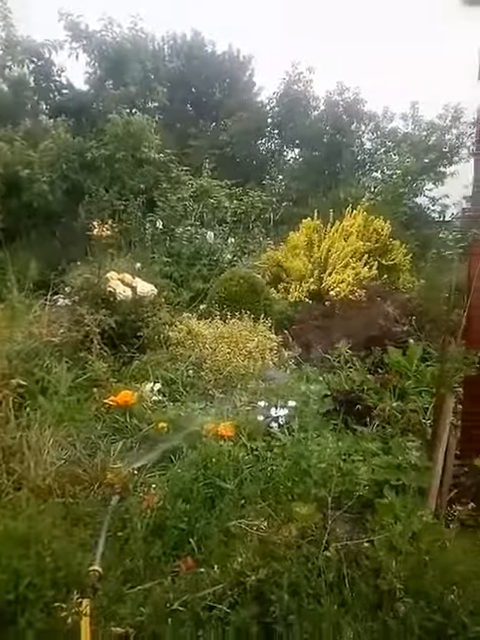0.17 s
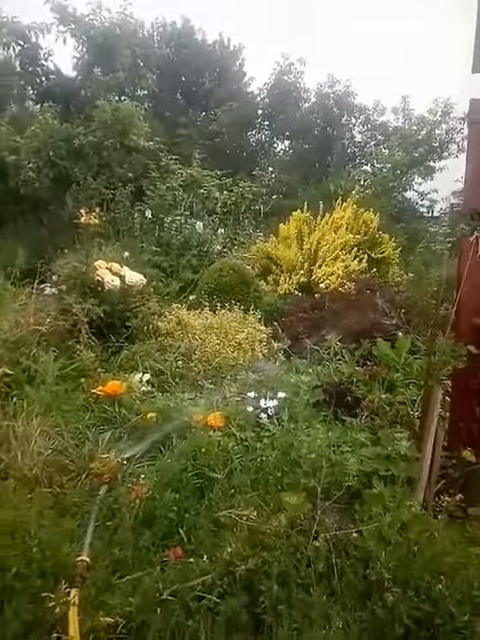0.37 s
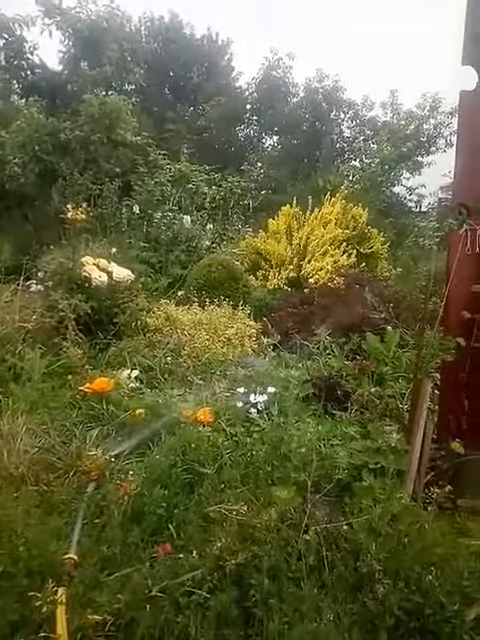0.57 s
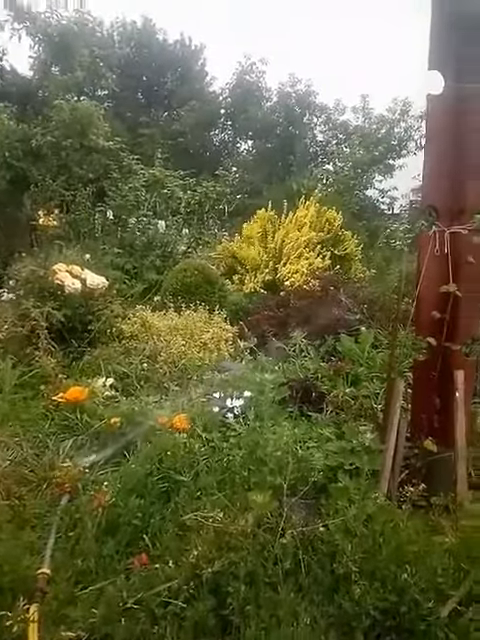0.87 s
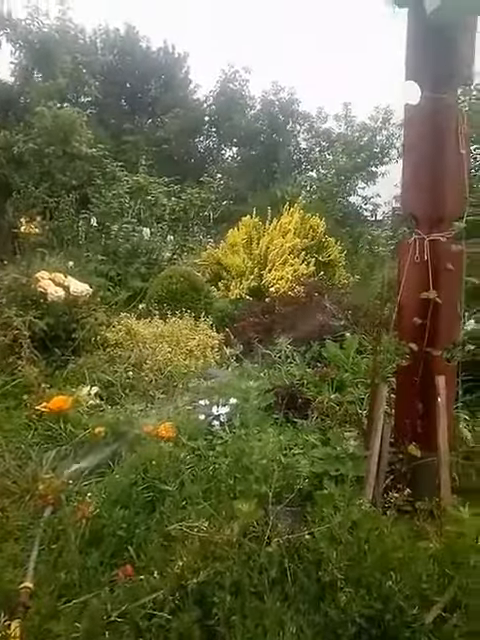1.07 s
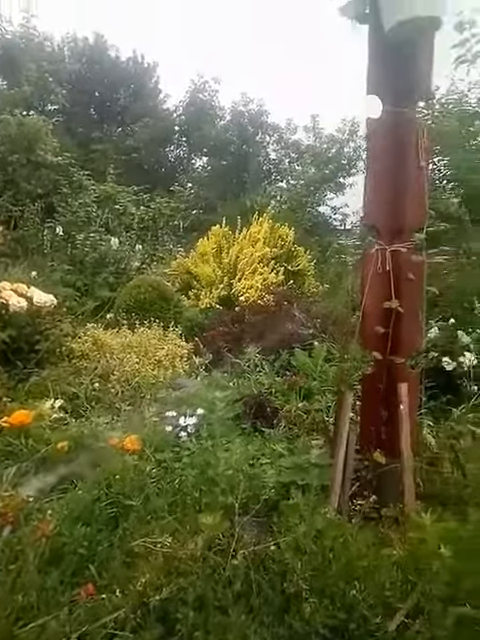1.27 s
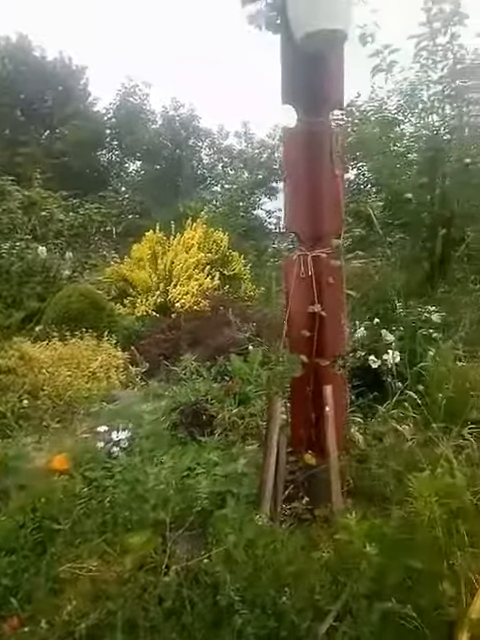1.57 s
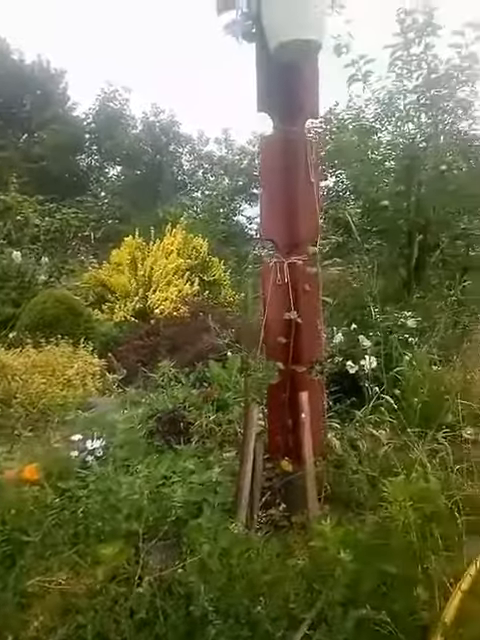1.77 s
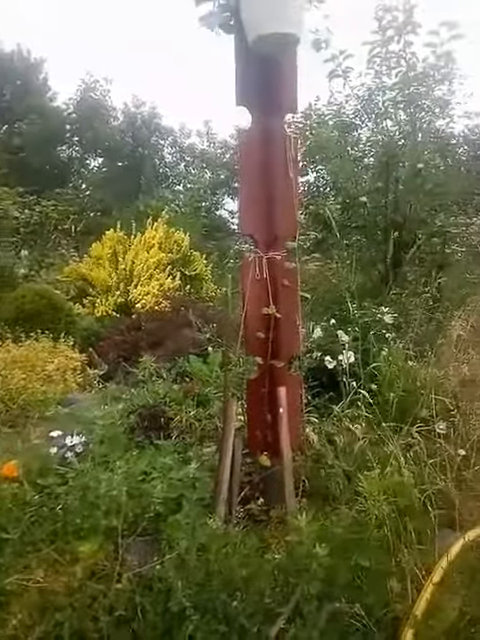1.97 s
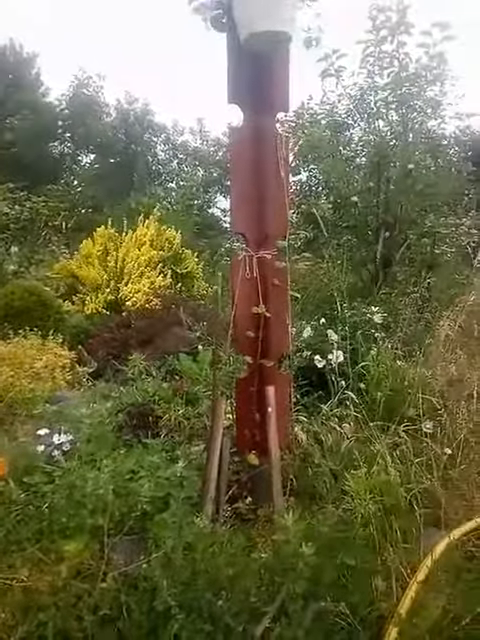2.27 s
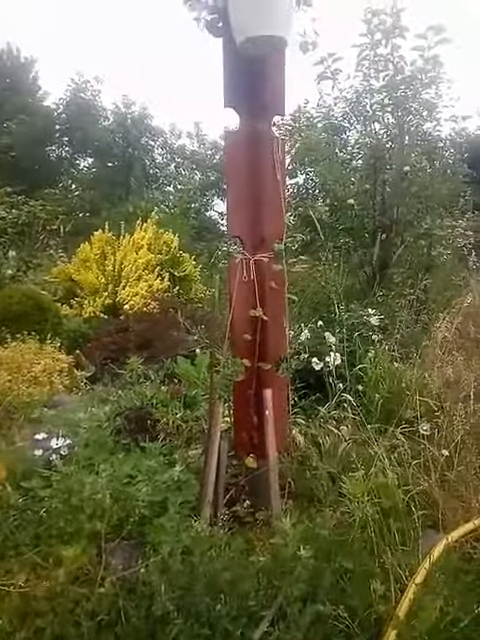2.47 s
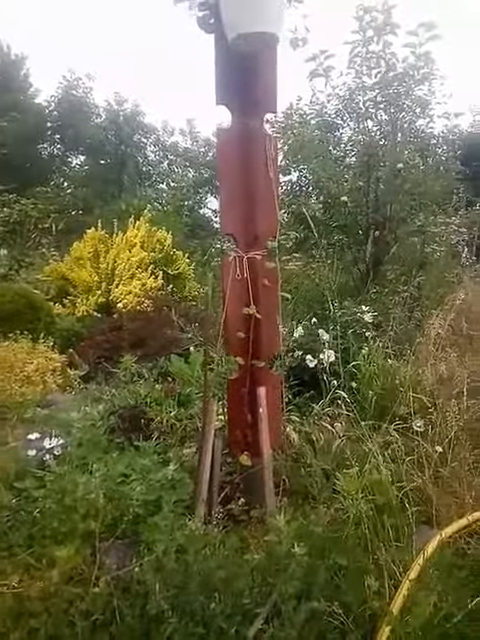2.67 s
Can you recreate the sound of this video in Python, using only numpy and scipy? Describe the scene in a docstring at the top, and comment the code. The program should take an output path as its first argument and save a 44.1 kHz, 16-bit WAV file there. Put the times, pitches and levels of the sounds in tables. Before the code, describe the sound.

An impact sprinkler a few metres off to the left knocks about five times a second, each sharp metallic tick followed by a brief splash; the jet hisses and drops patter on leaves, with faint breeze on the microphone.

```python
"""A free jet hisses to the left, over patter on leaves and a light breeze at the microphone: coloured noise and ticks.
A few metres off in the garden, five times a second, the sprinkler's sprung arm swings into the jet and knocks
on the metal head (decaying sines and a noise crack). It is thrown out in a short splash, noise with a resonance
that sinks, and each splash ends in a small slap. Nearby, big drops hit leaves (filtered noise bursts)
and the grass rustles in brief swells of ringing ticks."""
import sys
import numpy as np
from scipy import signal
from scipy.fft import rfft, irfft
from scipy.io import wavfile

SR = 44100
rng = np.random.default_rng(int(sys.argv[2]) if len(sys.argv) > 2 else 0)


def master_out(mix):
    """Clip the mix to full scale and print it as 16-bit PCM to the path in sys.argv[1]."""
    frames = np.transpose(np.atleast_2d(mix))
    ceiling = np.clip(frames, -1, 1)
    pcm = np.round(ceiling * 32767).astype(np.int16)
    wavfile.write(sys.argv[1], SR, pcm)


N = 124362
TIME = np.arange(N) / SR  # s
FREQS = np.maximum(np.arange(N // 2 + 1) * SR / N, 1)  # Hz

# strokes of the arm: (time [s], knock [relative dB], splash as the arm enters [relative dB],
# splash as it leaves [relative dB], lead-in [s], last pitch of the spoon [Hz], parting slap [relative dB])
ARM_STROKES = [(.0603, 3.5, -2, -1.5, 0.0053, 5700, -5), (0.2499, 1.5, 0, 0.5, .005, 5210, 4),
               (0.4381, .5, 0, -5.5, 0.0054, 5730, -1), (0.629, 2.5, 1.5, -1.5, .002, 5700, 8.5),
               (.8198, -.5, -3, -1.5, .004, 5590, 1), (1.0098, 0, 4.5, .5, .0035, 5300, -0.5),
               (1.1989, .5, 2, -2, .005, 5080, 5.5), (1.3907, 1, -1, 2.5, 0.0039, 5280, 1),
               (1.581, .5, -7, -2, .005, 5394, 0), (1.7694, 2.5, -3, 4.5, .004, 5600, -5),
               (1.9592, 2, -3, 2, 0.007, 5570, -2.5), (2.1505, 1, -3, 1, 0.0042, 5300, 6),
               (2.3405, -1, -1, 2, .008, 5730, 6), (2.5305, -2, -4, 2, .009, 5470, -20),
               (2.7209, 3.5, -6.5, 4, 0.0038, 5260, 0)]
# likeness of the sprinkler's noise at the two ports: (frequency [Hz], correlation)
PORT_LIKENESS = [(500, 0.58), (3500, 1), (6000, 1), (8000, 0.31), (11000, 0.31), (15000, 0.23)]
# patter on the leaves: (time [s], level [dB])
LEAF_LEVEL = [(0, -47.5), (1.2, -47.5), (1.8, -45.5), (2.25, -46.5), (2.82, -42.5)]
IN_JET_S = 0.0322  # time the spoon stays in the jet


def from_db(db):
    """Decibels to gain."""
    return 10 ** (np.asarray(db) / 20)


def rms_one(x):
    """Scale to unit power."""
    return x / np.sqrt(np.mean(x ** 2) + 1e-20)


def level(rows):
    """Gain over time from (s, dB) points."""
    return from_db(np.interp(TIME, *np.transpose(rows)))


def bell(centre_s, spread_s):
    """A smooth swell of height 1; the spread is its standard deviation."""
    return np.exp(-0.5 * ((TIME - centre_s) / spread_s) ** 2)


def over_hz(points):
    """Join (Hz, value) points on a log axis."""
    hz, value = np.transpose(points)
    return np.interp(np.log(FREQS), np.log(hz), value)


def colour(x, spectrum):
    """Filter a signal by a (Hz, dB) spectrum, then scale to unit power."""
    return rms_one(irfft(rfft(x) * from_db(over_hz(spectrum)), N))


def flutter(rate_hz):
    """Low-passed noise with spread 1: random change up to about the given rate."""
    return rms_one(irfft(rfft(rng.standard_normal(N)) / (1 + (FREQS / rate_hz) ** 2), N))


def noise_pair(alike):
    """White noise in two channels with a given correlation."""
    mid, side = rfft(rng.standard_normal((2, N)))
    alike = np.clip(alike, -1, 1)
    spectra = np.sqrt(1 + alike) * mid + np.sqrt(1 - alike) * side * [[1], [-1]]
    return rms_one(irfft(spectra, N))


def ring(clicks, hz, t60):
    """Each unit click sets off a sine that starts near height 1 and falls 60 dB in t60 seconds."""
    radius = np.exp(-np.log(1000) / (t60 * SR))
    angle = 2 * np.pi * hz / SR
    return signal.lfilter([0, np.sin(angle)], [1, -2 * radius * np.cos(angle), radius ** 2], clicks + 1e-18)


def leaf_ticks(per_s, cycles, spread_db):
    """Random ticks, dealt to leaves of many pitches and places; each falls 60 dB in a few cycles."""
    sizes = from_db(spread_db * np.minimum(rng.exponential(1, N), 3)) * rng.choice([-1, 1], N)
    ticks = sizes * (rng.random(N) < per_s / SR)
    pitches = np.geomspace(480, 6500, num=30)  # Hz
    dealt = rng.integers(0, len(pitches), N)
    pans = rng.normal(0, 1.5, len(pitches))  # dB
    out = np.zeros((2, N))
    for leaf, (hz, pan) in enumerate(zip(pitches, pans)):
        ringing = ring(ticks * (dealt == leaf), hz, cycles / hz)
        out += ringing * np.sqrt(hz) * from_db([[pan], [-pan]])
    return rms_one(out)


def jet():
    """The free jet hisses and sputters at the nozzle: noise with a fluttering level and brief swells."""
    # hiss of the jet: (frequency [Hz], density [relative dB per Hz])
    jet_spectrum = [(1000, -17), (3000, -26), (6500, -4), (8200, -4.5), (11000, 1), (14000, 2.5),
                    (16000, 1)]
    # hiss before flutter and sputter: (time [s], level [dB])
    jet_level = [(0, -49.5), (.5, -45.5), (1.1, -48), (1.6, -47), (2.1, -46), (2.28, -45), (2.42, -42),
                 (2.82, -44)]
    # sputters: (time [s], height above the hiss [dB])
    sputters = [(.78, 4), (1.15, 3), (1.372, 5.5), (2.126, 3)]
    sputter_s, flutter_db = 0.0073, 3
    sputter_db = sum(db * bell(s, sputter_s) for s, db in sputters)
    unrest_db = flutter_db * flutter(81) + sputter_db
    return level(jet_level) * from_db(unrest_db) * colour(noise_pair(alike=0.088), jet_spectrum)


def patter():
    """Near drops tick on the leaves as random clicks; the far ones merge into a wash of noise."""
    # drops on leaves: (frequency [Hz], density [relative dB per Hz])
    patter_spectrum = [(300, -19), (700, -8.5), (2000, -0.5), (3200, 5), (5000, 5.5), (6500, 9.5),
                       (8200, -5), (11000, -7.5), (16000, -9)]
    drops_per_s, size_spread_db, drift_db = 2600, 3, 2.2
    drop_share = 0.42  # of the power, before colouring
    sizes_db = size_spread_db * np.minimum(rng.exponential(1, (2, N)), 5)
    sizes = from_db(sizes_db) * rng.choice([-1, 1], (2, N))
    drops = rms_one(sizes * (rng.random((2, N)) < drops_per_s / SR))
    mix = np.sqrt(drop_share) * drops + np.sqrt(1 - drop_share) * noise_pair(alike=0)
    drift = from_db(drift_db * flutter(37))
    return level(LEAF_LEVEL) * drift * colour(mix, patter_spectrum)


def drips():
    """Single drops fall in clumps, each setting a leaf ringing among the patter."""
    # ringing leaves: (frequency [Hz], gain [relative dB])
    drip_spectrum = [(400, -9), (1200, -1.5), (4500, 6.5), (7000, -9.5), (12000, -20)]
    drips_per_s, clump_db = 420, 3.5  # middle rate and its random spread
    drip_db = -10.5  # against the patter
    rate = drips_per_s * from_db(clump_db * flutter(22))
    ticks = leaf_ticks(rate, cycles=13.5, spread_db=3.0)
    return level(LEAF_LEVEL) * from_db(drip_db) * colour(ticks, drip_spectrum)


def breeze():
    """Distant hush, and lumpy low wind noise with a few sine buffets, leaning to the left port."""
    # distant outdoor hush: (frequency [Hz], density [relative dB per Hz])
    air_spectrum = [(100, 1.5), (250, -3), (380, -9.5), (560, -.5), (790, -5), (1150, -3.5), (3000, -9),
                    (8000, -19.5)]
    # hush: (time [s], level [dB])
    air_level = [(0, -55.5), (.55, -60), (.95, -55.5), (1.8, -54.8), (2.82, -57)]
    # wind on the microphone: (frequency [Hz], density [relative dB per Hz])
    wind_spectrum = [(15, -32), (35, -23), (62, 1.5), (110, 1), (170, -3.5), (300, -10.5), (700, -43),
                     (3000, -72)]
    # wind before lumps and pan: (time [s], level [dB])
    wind_level = [(0, -59.5), (.12, -64), (.25, -55.5), (.45, -58), (.68, -52.5), (.79, -66), (1.3, -60),
                  (1.65, -61.5), (2.1, -68), (2.5, -66), (2.68, -56), (2.82, -64)]
    # soft buffets on the microphone: (time [s], height before pan [dB], pitch [Hz], spread [s])
    buffet_rows = [(.379, -36.5, 100, .005), (1.653, -49, 67.9, .028), (1.87, -52.5, 90, .013),
                   (2.6, -54, 54, .022)]
    pan_db, lump_db = 3.2, 2
    buffets = sum(from_db(db) * bell(s, spread) * np.sin(2 * np.pi * hz * (TIME - s))
                  for s, db, hz, spread in buffet_rows)
    lumps = from_db(lump_db * flutter(7.3))
    wind = level(wind_level) * lumps * colour(noise_pair(alike=0.45), wind_spectrum)
    hush = level(air_level) * colour(noise_pair(alike=0.77), air_spectrum)
    return hush + (wind + buffets) * from_db([[pan_db], [-pan_db]])


def knocks():
    """The arm hits the wet head and bounces: a short crack, and every mode rings with a strength of its own."""
    # ringing of head and arm: (frequency [Hz], strength [relative dB], 60 dB decay [s])
    head_modes = [(1150, -31, 0.049), (3390, -25, 0.05), (5540, -6.5, 0.017), (6626, -7.5, 0.032),
                  (7210, -4.5, 0.047), (8500, -17, 0.063), (9790, -3.5, 0.016), (11230, -12.5, 0.016),
                  (12630, -2.5, 0.029)]
    # crack of the blow: (frequency [Hz], density [relative dB per Hz])
    crack_spectrum = [(500, -23.5), (1200, -18), (2000, -15), (3500, -0.5), (5200, 9), (7200, -1.5),
                      (10000, 5.5), (13000, 8), (15000, -10)]
    ring_db, crack_db, bounce_db = -24.5, -22, -2
    crack_rise_s, crack_decay_s = 0.0008, 0.0021
    s, db = np.transpose(ARM_STROKES)[:2]
    bounce = s + rng.uniform(0.001054, 0.00272, len(s))  # the arm bounces once
    ringing = np.zeros(N)
    for hz, mode_db, t60 in head_modes:
        clicks = np.zeros(N)
        for when, touch_db in ((s, 0), (bounce, bounce_db)):
            strength_db = db + touch_db + mode_db + rng.normal(0, 1.0, len(s))
            clicks[(when * SR).astype(int)] += from_db(strength_db) * rng.choice([-1, 1], len(s))
        ringing += ring(clicks, hz, t60)
    swell = np.zeros(N)
    for when, knock_db in zip(s, db):
        age = TIME - when
        swell += from_db(knock_db) * np.exp(np.minimum(age / crack_rise_s, -age / crack_decay_s))
    crack = swell * colour(noise_pair(over_hz(PORT_LIKENESS)), crack_spectrum)
    return from_db(ring_db) * ringing + from_db(crack_db) * crack


def splashes():
    """While the spoon cuts the jet, water tears off it in a rough hiss with a sinking resonance."""
    # spray: (frequency [Hz], density [relative dB per Hz])
    spray_spectrum = [(300, -27.5), (1000, -19), (2000, -15), (2900, -1), (3900, -8), (5000, -0.5),
                      (7500, 3), (9000, 2), (11300, 3.5), (13500, -0.5), (16000, 2)]
    spray_db, rough_db, release_s = -32, 1.5, 0.003
    # resonance of the water on the arm's spoon
    start_hz, width_hz, wobble_hz = 7115, 1580, 120.37
    spoon_db, grain_db = -31.5, 2
    flow, pitch = np.zeros(N), np.full(N, float(start_hz))
    for s, _, enter_db, leave_db, lead, end_hz, _ in ARM_STROKES:
        age = TIME - s
        turn = np.clip(age / IN_JET_S, 0, 1)  # 0 as the spoon enters, 1 as it leaves
        rise = (np.minimum(age, 0) / lead) ** 2
        fall = np.maximum(age - IN_JET_S, 0) / release_s
        flow += np.exp(-rise - fall) * from_db(enter_db + (leave_db - enter_db) * turn)
        sinking = start_hz + (end_hz - start_hz) * turn ** 1.4
        pitch = np.where(age > -IN_JET_S, sinking, pitch)
    flow *= from_db(rough_db * flutter(750))
    # slow noise on sine and cosine carriers makes a noise band centred on the moving pitch
    band = 1 / (1 + (FREQS / width_hz) ** 2) ** 2
    phase = 2 * np.pi * np.cumsum(pitch + wobble_hz * flutter(80.64)) / SR
    spoon = np.zeros((2, N))
    for wave in (np.sin, np.cos):
        spoon += irfft(rfft(noise_pair(alike=0.53)) * band, N) * wave(phase)
    spoon_gain = from_db(spoon_db + grain_db * flutter(250))
    spray = colour(noise_pair(over_hz(PORT_LIKENESS)), spray_spectrum)
    return flow * (spoon_gain * rms_one(spoon) + from_db(spray_db) * spray)


def slaps():
    """Water slaps off the spoon as it leaves the jet: a dull swell of noise ends each splash."""
    # slap: (frequency [Hz], density [relative dB per Hz])
    slap_spectrum = [(400, -16), (1100, -2), (3200, 0), (4500, -1), (16000, -32)]
    slap_db, spread_s = -44.5, 0.0033
    swell = sum(from_db(db) * bell(s + IN_JET_S, spread_s) for s, *_, db in ARM_STROKES)
    return from_db(slap_db) * swell * colour(noise_pair(alike=0.76), slap_spectrum)


def garden(x):
    """The soil reflects once; the shrubs scatter a short, thin tail of decaying noise."""
    ground_lag_s, ground_db = 0.0021, -16
    tail_db, tail_t60_s = -8, 0.14
    age = TIME[:SR // 2]
    tail = rng.standard_normal((2, len(age))) * np.exp(-np.log(1000) * age / tail_t60_s)
    tail /= np.sqrt(np.sum(tail ** 2, axis=1, keepdims=True))
    ground = irfft(rfft(x) * np.exp(-2j * np.pi * FREQS * ground_lag_s), N)
    scattered = signal.fftconvolve(x, tail, axes=1)[:, :N]
    return x + from_db(ground_db) * ground + from_db(tail_db) * scattered


def from_left(x):
    """The right port, farther from the sprinkler, hears it later and duller."""
    # far port against near port: (frequency [Hz], gain [dB])
    right_shade = [(500, 0.5), (3000, 0.5), (5500, -3), (7200, -3.5), (9500, -5.5), (11500, -15),
                   (15000, -15.5)]
    lag_s = 0.00015
    far = from_db(over_hz(right_shade)) * np.exp(-2j * np.pi * FREQS * lag_s)
    return np.array([x[0], irfft(rfft(x[1]) * far, N)])


def heavy_drops():
    """A few big drops slap on leaves close by: decaying noise bursts, each filtered at its leaf's pitch."""
    # heavy drops: (time [s], level at the start [dB], pitch of the leaf [Hz])
    drop_rows = [(.352, -39, 3840), (0.7804, -39.5, 3550), (0.9567, -38, 4600), (1.3375, -40, 3170),
                 (1.857, -35.5, 5600), (2.0144, -38.5, 3230), (2.409, -34, 5570), (2.4973, -39.5, 2420),
                 (2.515, -37, 5600), (2.7672, -38, 1470), (2.805, -41, 4200)]
    decay_s, width = 0.0023, 0.27  # width as a share of the pitch
    burst = rfft(noise_pair(alike=0.43))
    out = np.zeros((2, N))
    for s, db, hz in drop_rows:
        leaf = rms_one(irfft(burst / (1 + 1j * (FREQS / hz - hz / FREQS) / width), N))
        decay = (TIME >= s) * np.exp(-abs(TIME - s) / decay_s)
        out += from_db(db) * decay * leaf
    return out


def rustles():
    """Brief crackly swells in the grass nearby: dense ringing ticks."""
    # rustles: (time [s], peak level [dB], spread [s])
    rustle_rows = [(.354, -49.5, .005), (1.011, -50, .02), (1.412, -51.5, 0.014), (1.933, -53.5, .011),
                   (2.335, -46.5, .022), (2.401, -46.5, .012), (2.501, -41.5, .0055), (2.73, -45.5, .017)]
    # grass: (frequency [Hz], gain [relative dB])
    rustle_spectrum = [(200, -5), (600, 0.5), (1500, 6.5), (3000, 7), (5000, -9), (16000, -30)]
    swell = sum(from_db(db) * bell(s, spread) for s, db, spread in rustle_rows)
    ticks = leaf_ticks(per_s=2200, cycles=13.4, spread_db=0.5)
    return swell * colour(ticks, rustle_spectrum)


def scene():
    """The sprinkler on the left, wet leaves and breeze all round."""
    strokes = garden(knocks() + splashes() + slaps())
    sprinkler = from_left(jet() + strokes)
    leaves = patter() + drips() + heavy_drops()
    return sprinkler + leaves + breeze() + rustles()


def record(dry):
    """The microphone ports ring in the top treble; above that the sound is cut."""
    port_hz, port_width_hz, port_db = 14930, 500, 14
    cutoff_hz = 15550
    port = from_db(port_db * np.exp(-0.5 * ((FREQS - port_hz) / port_width_hz) ** 2))
    cut = 1 / np.sqrt(1 + (FREQS / cutoff_hz) ** 400)
    return irfft(rfft(dry) * port * cut, N)


dry = scene()
out = record(dry)
master_out(out)
```